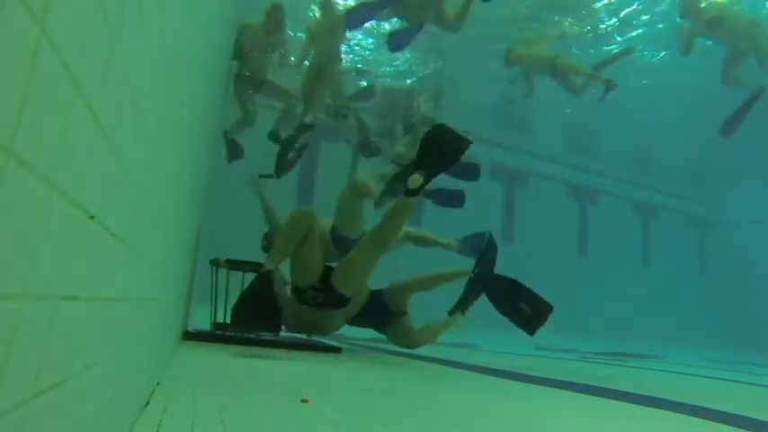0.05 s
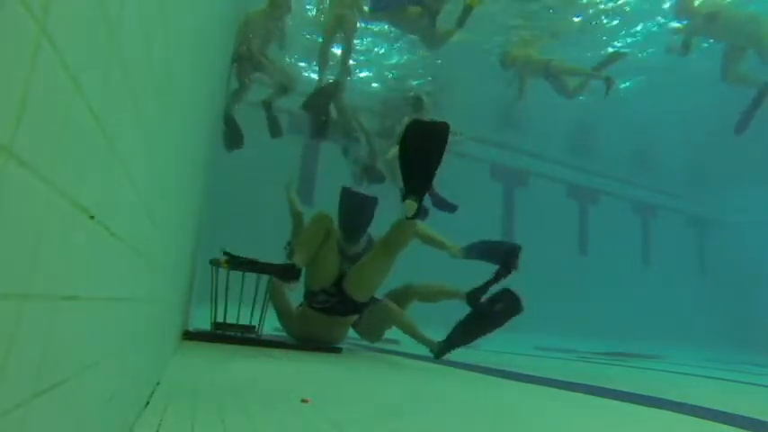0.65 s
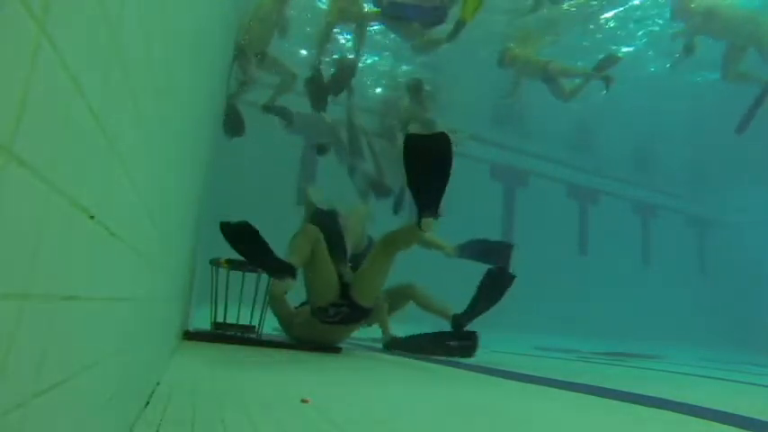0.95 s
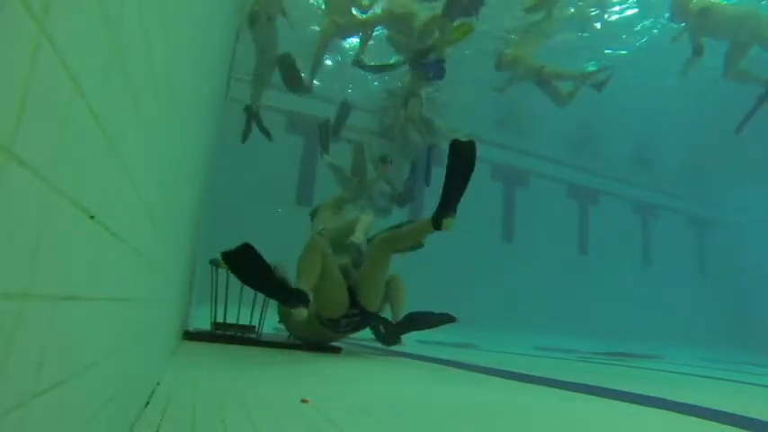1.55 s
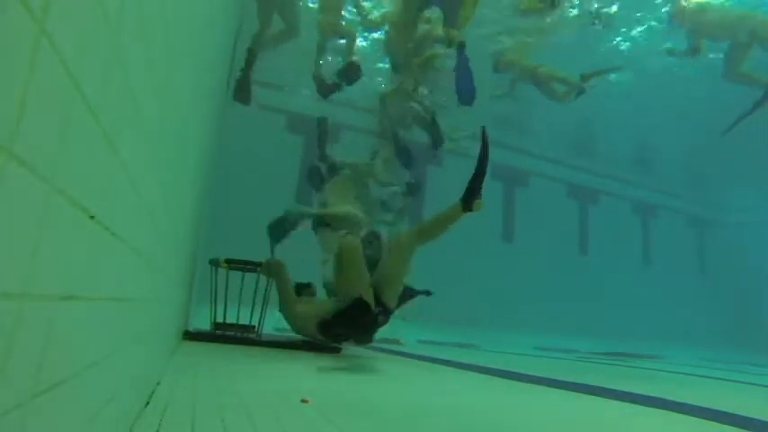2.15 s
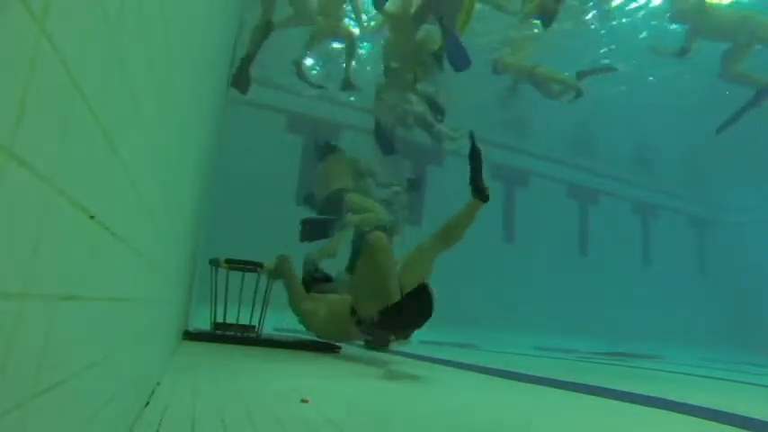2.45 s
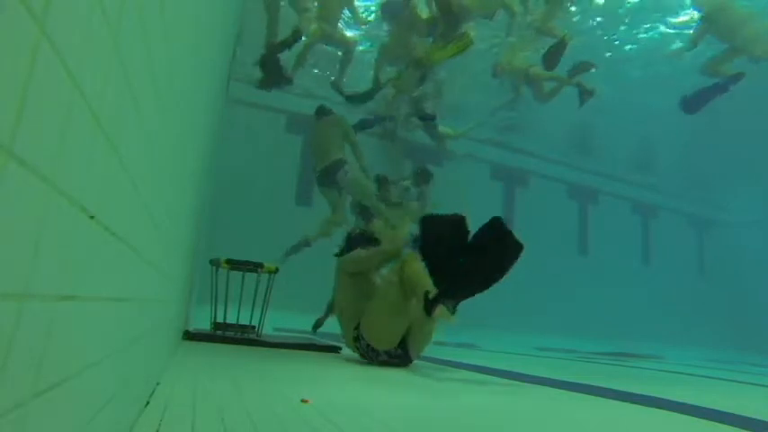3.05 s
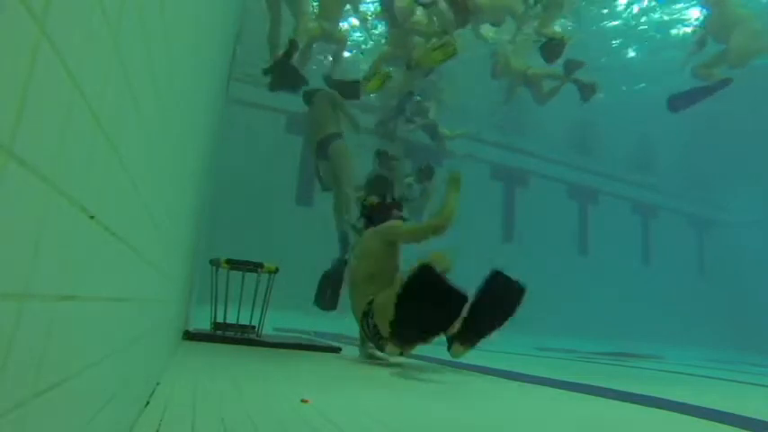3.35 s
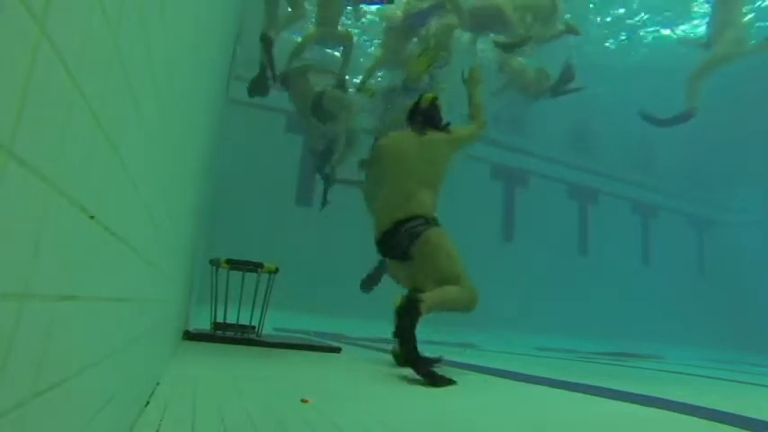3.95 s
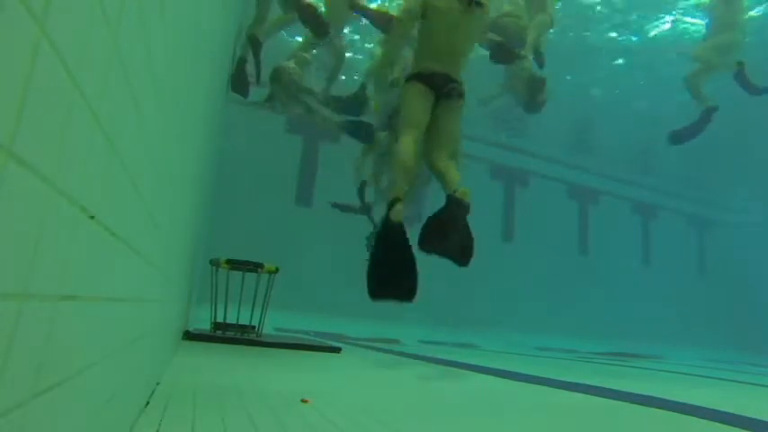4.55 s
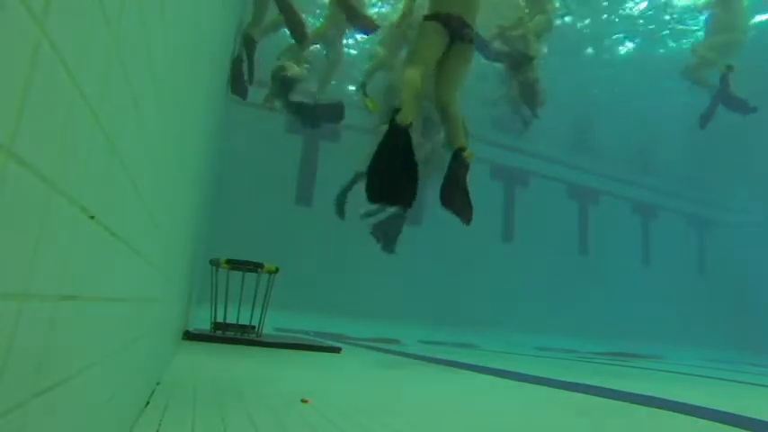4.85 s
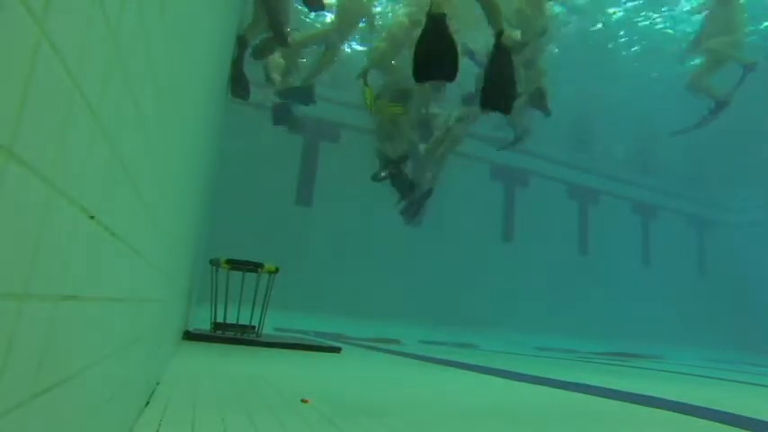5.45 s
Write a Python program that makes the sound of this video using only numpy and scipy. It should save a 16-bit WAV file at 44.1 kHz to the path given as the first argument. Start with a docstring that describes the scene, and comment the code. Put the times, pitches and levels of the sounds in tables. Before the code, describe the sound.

A swimming pool heard through a microphone in an underwater housing. A sharp clack opens over steady rushing water and a pump's hum. Finned swimmers then make a run of knocks, about four a second, first dull thuds and then louder, sharp, hollow clacks. The knocking stops, leaving the rush, the hum and small bubble blips.

```python
"""A sharp clack over rushing water and a pump's hum: a swimming pool, heard from a camera in an underwater
housing. Finned swimmers make a run of knocks, about four a second: sharp clacks open it, dull thuds crowd its
middle, and more sharp clacks follow; each excites the resonances of the housing and is reflected between the
walls. Bubbles blip as their air oscillates, a few fin beats push the water, and the camera's electronics add a
faint whine."""
import sys
import numpy as np
from scipy import signal
from scipy.fft import rfft, irfft, next_fast_len
from scipy.io import wavfile
from scipy.ndimage import uniform_filter1d, minimum_filter1d, map_coordinates

SR = 44100
rng = np.random.default_rng(int(sys.argv[2]) if len(sys.argv) > 2 else 0)


def output_pcm(signal):
    """Save a mono or channel-first signal as 16-bit PCM at the path in sys.argv[1].

    Samples are clipped to [-1, 1] before scaling.
    """
    pcm = np.clip(np.atleast_2d(signal).T, -1, 1) * 32767
    wavfile.write(sys.argv[1], SR, np.round(pcm).astype(np.int16))


N = 247842
LEAD_S = .012  # quiet run-in before each knock


def thuds():
    """Impact and free decay: a soft blow thumps at its own pitch and leaves three modes ringing."""
    # t/s, body level/dB, tilt/(dB per octave), thump f/Hz, thump level/dB, ring level/dB
    blows = [(.965, -42, 9.5, 427, -3.5, -22), (1.184, -35, -3, 446, -3.5, -8),
             (1.416, -28, -2.5, 361, 0, -6), (1.639, -34, 0, 433, -0.5, -17.5),
             (1.863, -45, 4, 437, -4, -8), (2.109, -28, -0.5, 400, -5, -19)]
    # modes left ringing: f/Hz, relative level/dB, T60/s
    modes = [(439, -17.5, 0.29), (633, -4, 0.19), (799, -15, 0.15)]
    # body bands, low to high: relative level/dB
    body_db = [-17, -3.5, 1, -16.5, -22, -15]
    # timbre common to all thuds: the last seven arguments of knock(), six in dB and one in s
    timbre = (0, -66, -10, -93, -4.5, 2, .007)
    out = np.zeros(N)
    for s, level_db, tilt_db, thump_hz, thump_db, ring_db in blows:
        add(out, s - LEAD_S, knock(body_db, level_db, tilt_db, *timbre))
        add(out, s, amp(thump_db) * ring(thump_hz, t60=.045, attack_s=.005))
        for (hz, db, t60), lag_cycles in zip(modes, rng.random(len(modes))):
            mode = ring(hz, t60, attack_s=.006, wander_rad=.45)
            add(out, s + .008 + lag_cycles / hz, amp(ring_db + db) * mode)
    return out


def clacks():
    """Hard impact: a brief force has a wide spectrum, so clatter and click top a sagging low thump."""
    # t/s, thump level/dB, body level/dB, tilt/(dB per octave), hollowness/dB, clatter level/dB,
    # upper re lower clatter/dB, click level/dB, upper re lower click/dB, echo level/dB, scrape time/s
    blows = [(0.0147, -23, -30, 1.5, -3, -45, -1.5, -55.5, -16, -19.5, 0.0029),
             (0.77, -46, -45, 7.5, 1, -57, -20, -86, -19, -4, 0.0053),
             (1.8625, -29, -31.5, 0, -9.5, -46.5, -12, -67, -8.5, 0.5, 0.0038),
             (1.932, -39, -58.5, 10.5, 8, -56, -8.5, -77.5, -14.5, -1, 0.0036),
             (2.1493, -15, -32, -2, 3, -47, -9, -62.5, -5.5, -1.5, 0.0041),
             (2.377, -24, -43, 9.5, 7, -53.5, -3, -66.5, -9, -2.5, 0.0053),
             (2.3842, -8, -39, 0, 10.5, -47.5, -11, -67, -4.5, -7, 0.002),
             (2.6085, -17, -35, 2.5, -0.5, -51, -5, -67, -11, -2.5, 0.0052),
             (2.84, -19.5, -48.5, 7.5, 1, -51.5, -8, -70.5, -7.5, 0, 0.0043),
             (3.022, -5, -31.5, 1, 6.5, -47.5, -4, -71, -9, -6, .003),
             (3.082, -14.5, -47.5, 10, 0, -50.5, -10.5, -71.5, -3.5, -0.5, .006),
             (3.3093, -9, -36, 6.5, 6, -69, -7, -68, -26, -25, .0028),
             (3.3228, -14, -42, 7, 9, -45.5, -10, -68, -4.5, 1, 0.0024),
             (3.69, -38, -50.5, -1.5, -6, -60, -3.5, -79.5, -6, 3, 0.0032)]
    # body bands, low to high: relative level/dB
    body_db = [ -30.5, -9.5, 3.5, -6, -12.5, -7]
    thump = ring(485, t60=.046, attack_s=.0016, glide=-.11)
    out = np.zeros(N)
    for s, thump_db, *blow in blows:
        add(out, s + .002, amp(thump_db) * thump)
        add(out, s - LEAD_S, knock(body_db, *blow))
    return out


def knock(body_db, level_db, tilt_db, hollow_db, clatter_db, upper_clatter_db,
          click_db, upper_click_db, echo_db, scrape_s):
    """Source and filter: the pressure of a blow drives the housing, each band to its given level."""
    # bands of the body, the clatter and the click: lower f/Hz, upper f/Hz
    body_bands = [(180, 280), (300, 470), (540, 700), (760, 940), (1020, 1200), (1280, 1700)]
    clatter_bands = [(1850, 2400), (2600, 3700)]
    click_bands = [(4000, 7000), (8800, 14000)]
    bands = body_bands + clatter_bands + click_bands
    pivot_hz, hollow_hz, hollow_width_hz = 617, 840, 100
    t = np.arange(2 * (SR // 8)) / SR
    hz = np.fft.rfftfreq(len(t), 1 / SR)
    case, pressure = housing(hz), arrival(t, hz, echo_db, scrape_s)
    centres = np.mean(body_bands, axis=1)
    hollow = hollow_db * np.exp(-((centres - hollow_hz) / hollow_width_hz) ** 2)
    body = level_db + tilt_db * np.log2(centres / pivot_hz) + hollow + body_db
    band_db = np.r_[body, clatter_db, clatter_db + upper_clatter_db, click_db, click_db + upper_click_db]
    carried = [np.linalg.norm((pressure * case)[(hz > lo) & (hz < hi)]) / len(t) for lo, hi in bands]
    log_gain = np.log(amp(band_db) / carried)
    colour = np.exp(np.interp(hz, np.ravel(bands), np.repeat(log_gain, 2)))
    blow = irfft(pressure * minimum_phase(case * colour))
    return np.roll(blow, round(LEAD_S * SR)) * signal.windows.tukey(len(t), LEAD_S / t[-1])


def housing(hz):
    """Resonant transmission: the modes of the case, summed in power, pass pressure to the microphone."""
    # resonances: f/Hz, bandwidth/Hz, level/dB
    modes = [(220, 90, -18), (370, 110, -5), (450, 60, -3), (580, 80, -1), (645, 80, 0), (830, 100, -6),
             (1060, 130, -16), (1330, 140, -9), (1530, 170, -9), (1950, 180, -20), (2300, 260, -24),
             (2750, 350, -27), (3500, 700, -35), (4700, 1000, -40), (6500, 1600, -45), (9300, 1800, -50),
             (12500, 3500, -55)]
    gains = [amp(db) / (1 + (2 * (hz - centre) / width) ** 2) for centre, width, db in modes]
    return np.sqrt(sum(gain ** 2 for gain in gains))


def arrival(t, hz, echo_db, scrape_s):
    """Multipath propagation: the spectrum of a direct pulse, its scrape, two wall echoes and a tail."""
    # paths through the pool: f/Hz, direct level/dB, factor on scrape time, echo level/dB, tail level/dB
    paths = [(750, -1, .55, -11, -11), (1500, -5, .8, -5, -10), (2600, -14, 1.15, -1, -9),
             (6000, -14, 1, -1, -14), (11000, -3, .3, -10, -28)]
    near_s, far_s, spread_s, tail_t60 = .014, .031, .005, .09
    bounce_loss_db, crackle_db = 10, 5
    grains = rng.standard_normal(len(t)) * amp(crackle_db * rng.standard_normal(len(t)))

    def cloud(envelope):
        """Scattering: grains of unit energy under an envelope."""
        return grains * envelope / np.linalg.norm(grains * envelope)

    def cluster(delay, spread):
        """Time spreading: grains build up quickly and die away."""
        age = np.maximum(t - delay, 0) / spread
        return cloud(np.sqrt(age) * np.exp(-age))

    walls = cluster(near_s, spread_s) + amp(-bounce_loss_db) * cluster(far_s, spread_s)
    tail = cloud(amp(-60 * t / tail_t60) * np.minimum(t / near_s, 1))
    log_hz = np.log([row[0] for row in paths])
    pressure = 0
    for (_, direct_db, stretch, walls_db, tail_db), band in zip(paths, np.eye(len(paths))):
        scattered = cluster(0, stretch * scrape_s) + amp(echo_db + walls_db) * walls + amp(tail_db) * tail
        crossfade = np.interp(np.log(hz + 1), log_hz, band)
        pressure = pressure + crossfade * (amp(direct_db) + rfft(scattered))
    return pressure


def water():
    """Flow noise: low surges, the swimmers' wash and their foam's fizz and hiss share one level curve."""
    # loudness of the water, ducked by the camera's gain control after the first clack,
    # then following the flow: t/s, level/dB
    loudness = [(0, 0.5), (.1, -2.5), (.35, 0.3), (.8, 0.5), (1.6, 0.95), (3.2, 2.55), (3.6, 1.5),
                (4.8, -0.5), (5.62, 0.9)]
    # spectra of the four layers: f/Hz, relative density level/dB
    surge_spectrum = [(15, -16), (23, -10), (29, -6), (37, -7), (44, -4), (57, 1), (70, -4), (88, -7),
                      (102, -10), (135, -7), (200, -6), (235, -8), (275, -10), (340, -28)]
    wash_spectrum = [(250, 1), (285, -9), (310, -3.5), (328, 4.5), (352, 1.5), (385, 2), (455, 2.5),
                     (490, -5), (530, -4), (575, 2), (660, 0), (720, -4.5), (810, -7), (980, -16.5),
                     (1200, -17.5), (1400, -52.5)]
    fizz_spectrum = [(1000, -34.5), (1200, -23), (1270, -1.5), (1420, -1.5), (1520, 6), (1620, -4),
                     (1700, -6), (1765, -20), (1850, -6), (1980, -7), (2080, -10), (2250, -13.5),
                     (3000, -22.5), (4200, -32)]
    hiss_spectrum = [(2800, -29), (3800, -0.5), (4500, 1), (4900, -3), (5400, 4), (5800, -3.5),
                     (6500, -2.5), (7400, -8.5), (9000, -8), (11000, -15), (12000, -2.5), (14000, -22),
                     (14600, -27)]
    swells_per_s = 6.4
    level_db = np.interp(clock(), *np.transpose(loudness))
    surge = amp(-37.5 + 1.6 * level_db + wobble(swells_per_s)) * rush(surge_spectrum, patchy_db=.25)
    wash = amp(-32.5 + level_db) * rush(wash_spectrum, patchy_db=1.37)
    fizz = amp(-41.5 + .84 * level_db) * rush(fizz_spectrum, patchy_db=1)
    hiss = amp(-68.5 + .69 * level_db - 1.5 * wobble(swells_per_s)) * rush(hiss_spectrum, patchy_db=1.2)
    return surge + wash + fizz + hiss


def fins():
    """Displacement of water: a strong fin beat reaches the case as a short, low throb of pressure."""
    # fin beats: t/s, level/dB
    beats = [(1.107, -10.5), (2.816, -15), (3.274, -10), (4.964, -11.5)]
    out = np.zeros(N)
    for s, db in beats:
        add(out, s, amp(db) * ring(55.7, t60=.14, attack_s=.014))
    return out


def large_bubbles(decay_cycles):
    """Bubble resonance: air dragged under rings at a pitch set by its size, all with the same Q."""
    # bubbles: t/s, f/Hz, level/dB, pitch glide
    blips = [(0.159, 2220, -25, 0.063), (.594, 4740, -44, 0), (0.597, 2770, -38, 0.014),
             (0.605, 1513, -18, 0.062), (1.887, 690, -15.5, .05), (2.120, 629, -10.5, 0.296),
             (2.329, 399, -13, 0), (2.375, 309, -19.5, -0.087), (2.733, 2470, -18.5, -0.31),
             (3.241, 1510, -23, 0.054), (3.607, 1100, -30.5, 0), (4.222, 5300, -40, 0.024),
             (5.101, 4330, -46, 0), (5.259, 4400, -43, 0), (5.440, 4350, -40, .05), (5.461, 624, -27, 0.07),
             (5.471, 1530, -23, 0.095)]
    out = np.zeros(N)
    for s, hz, db, glide in blips:
        add(out, s, amp(db) * ring(hz, t60=decay_cycles / hz, attack_s=.002, glide=glide))
    return out


def small_bubbles(count, level_db, centre_hz, log_spread, decay_cycles):
    """Bubble resonance at random times: the smaller the bubble, the higher and fainter its blip."""
    out = np.zeros(N)
    for when, smallness, weakness in rng.random((count, 3)):
        hz = centre_hz * np.exp(log_spread * (2 * smallness - 1))
        blip = ring(hz, t60=decay_cycles / hz, attack_s=2 / hz, glide=.028)
        add(out, when * N / SR, amp(level_db - 10 * weakness) * (centre_hz / hz) ** 2 * blip)
    return out


def pump(waver_db, drift_rad):
    """Rotating machinery: low orders waver in the moving water, under a putter and a thin whistle."""
    # line spectrum of the hum: f/Hz, relative level/dB
    lines = [(29.6, -44), (58.5, -53.5), (118, -49), (148.3, -41), (162.5, -49), (177.4, -42), (192.3, -49),
             (207, -40.5), (223.5, -42), (236.8, -49.5), (266, -52.5), (329, -52)]
    # loudness of hum and putter, recovering from the camera's gain dip after the first clack,
    # then drifting slowly: t/s, level/dB
    loudness = [(0, -5), (.7, 0.5), (2, -1), (4.2, 1), (5.62, -1.5)]
    t = clock()
    hum = 0
    for hz, db in lines:
        waver = amp(waver_db * wobble(7.6))
        hum = hum + amp(db) * unit(waver * np.sin(2 * np.pi * hz * t + drift_rad * wobble(6)))
    whistle_gain = amp(-43.5 + .49 * wobble(5))
    whistle = unit(np.sin(2 * np.pi * 1295.5 * t + .082 * wobble(.47)))
    gain = amp(np.interp(t, *np.transpose(loudness)))
    return gain * (hum + pump_strokes()) + whistle_gain * whistle


def pump_strokes():
    """Periodic excitation: each turn of the pump sends a low pulse and a short rasp through the pipes."""
    # spectra of the pulse and the rasp: f/Hz, relative density level/dB
    pulse_spectrum = [(230, -35.5), (310, -12.5), (345, 3), (450, -1.5), (500, -8.5), (600, -0.5),
                      (700, -3.5), (790, -2.5), (860, -14), (980, -22), (1300, -43)]
    rasp_spectrum = [(1200, -30), (1400, -10), (1525, 4.5), (1640, -12.5), (1770, -29), (1950, -15.5),
                     (2100, -25.5), (2260, -11), (2420, -36.5), (2570, -14.5), (2700, -33), (2830, -22),
                     (3200, -47)]
    turn_hz, first_stroke_s, scatter_db = 29.59, .0305, 1
    rasp_attack_s, rasp_length_s = .003, .016
    age_s = (clock() - first_stroke_s) * turn_hz % 1 / turn_hz
    pulses = (np.diff(age_s, prepend=0) < 0) * amp(scatter_db * wobble(turn_hz))
    hz = np.fft.rfftfreq(2 * (SR // 8), 1 / SR)
    pipe_response = irfft(minimum_phase(coloured(pulse_spectrum, hz) + amp(-90)))
    putter = signal.fftconvolve(pulses, pipe_response)[:N]
    gate = (1 - np.exp(-age_s / rasp_attack_s)) * np.exp(-(age_s / rasp_length_s) ** 2)
    rasp = gate * rush(rasp_spectrum, patchy_db=2)
    return amp(-40) * unit(putter) + amp(-44) * unit(rasp)


def whine(buzz_db, frame_hz):
    """Amplitude modulation: narrow noise bands pulse at the frame rate beside steady electronic tones."""
    # tones: f/Hz, rms level/dB
    lines = [(3898, -80), (3957, -79), (7853, -88), (7913, -85), (11719, -88), (11779, -80), (11838, -81),
             (11898, -88)]
    # noise bands: f/Hz, relative density level/dB
    buzz_spectrum = [(7500, -43), (7900, -2.5), (8250, -16.5), (11300, -31.5), (11800, 3), (12300, -16.5)]
    t = clock()
    tones = sum(amp(db) * unit(np.sin(2 * np.pi * hz * t)) for hz, db in lines)
    buzz = rush(buzz_spectrum, patchy_db=-2) * (1 + np.cos(2 * np.pi * frame_hz * t))
    return tones + amp(buzz_db) * unit(buzz)


def ring(hz, t60, attack_s, glide=0, wander_rad=0):
    """Damped oscillator: its frequency shifts by the fraction 2 * glide per t60; its phase may wander."""
    t = np.arange(SR // 4) / SR
    drift = wander_rad * wobble(70)[:len(t)] if wander_rad else 0
    phase = 2 * np.pi * hz * t * (1 + glide * t / t60) + drift
    return np.sin(phase) * amp(-60 * t / t60) * (1 - np.exp(-t / attack_s))


def rush(spectrum, patchy_db):
    """Coloured noise of unit rms, its gain varying in random patches of time and frequency."""
    cells = signal.stft(rng.standard_normal(N), nperseg=512)[2]
    patches = uniform_filter1d(rng.standard_normal(cells.shape), size=4, axis=0)
    patches = uniform_filter1d(patches, size=3, axis=1)
    noise = signal.istft(cells * amp(patchy_db * unit(patches)), nperseg=512)[1][:N]
    return unit(filtered(noise, lambda hz: coloured(spectrum, hz)))


def coloured(spectrum, hz):
    """Band-pass gain through (f/Hz, level/dB) points on a logarithmic frequency axis."""
    f, db = np.transpose(spectrum)
    return amp(np.interp(np.log(hz + 1), np.log(f), db, left=-120, right=-120))


def minimum_phase(gain):
    """Causality: a response of this magnitude that rings only after the blow."""
    cepstrum = irfft(np.log(gain + 1e-9))
    half = len(cepstrum) // 2
    return np.exp(rfft(np.r_[cepstrum[0], 2 * cepstrum[1:half], np.zeros(half)]))


def filtered(x, response):
    """Linear filtering: the spectrum of x times a frequency response."""
    size = next_fast_len(len(x) + SR // 4)
    return irfft(rfft(x, size) * response(np.fft.rfftfreq(size, 1 / SR)), size)[:len(x)]


def wobble(rate):
    """Random modulation: a smooth curve with rate knots a second."""
    return map_coordinates(rng.standard_normal(int(N * rate / SR) + 4), [np.arange(N) * rate / SR])


def add(track, s, sound):
    """Superpose a sound on the track at time s."""
    start = max(round(s * SR), 0)
    track[start:start + len(sound)] += sound[:max(N - start, 0)]


def amp(db):
    return 10 ** (np.asarray(db) / 20)


def unit(x):
    return x / np.sqrt(np.mean(x ** 2) + 1e-20)


def clock():
    return np.arange(N) / SR


def scene():
    """Superposition: knocks, fin beats and bubbles over the water, the pump and the whine."""
    stray = small_bubbles(count=300, level_db=-39, centre_hz=2500, log_spread=.33, decay_cycles=22)
    crackle = small_bubbles(count=320, level_db=-49, centre_hz=5600, log_spread=.45, decay_cycles=20)
    bubbles = large_bubbles(decay_cycles=62) + stray + crackle
    electronics = whine(buzz_db=-86, frame_hz=59.9)
    background = water() + pump(waver_db=1, drift_rad=.91) + electronics
    return (thuds() + clacks() + fins() + bubbles + background)[None]


def record(dry):
    """Peak and band limiting: a fast gain dip holds down the loudest peaks; the top treble is cut."""
    ceiling, top_hz = .96, 15300
    needed = ceiling / np.maximum(np.abs(dry[0]), ceiling)
    gain = uniform_filter1d(minimum_filter1d(needed, size=200), size=200)
    return filtered(gain * dry[0], lambda hz: hz < top_hz)[None]


dry = scene()
out = record(dry)
output_pcm(out)
```